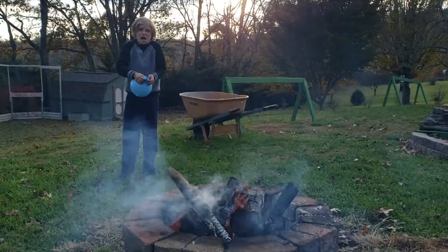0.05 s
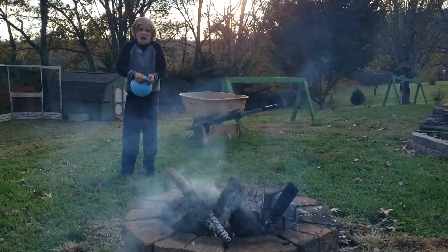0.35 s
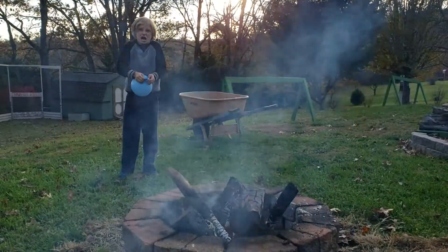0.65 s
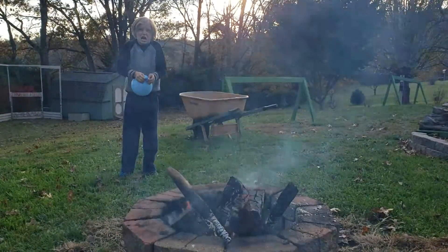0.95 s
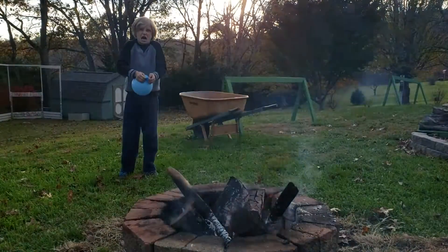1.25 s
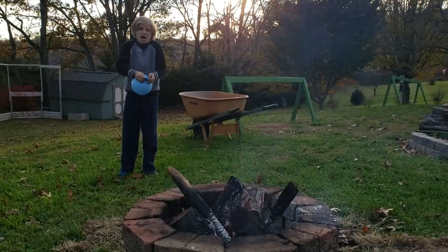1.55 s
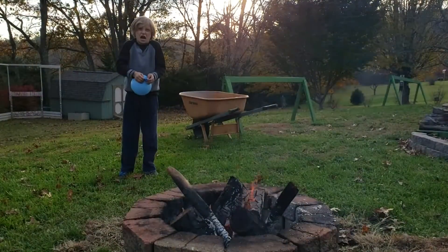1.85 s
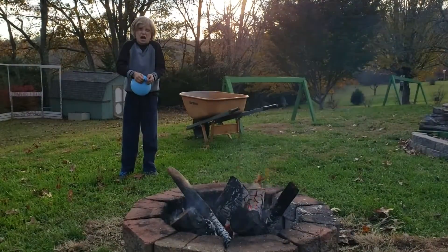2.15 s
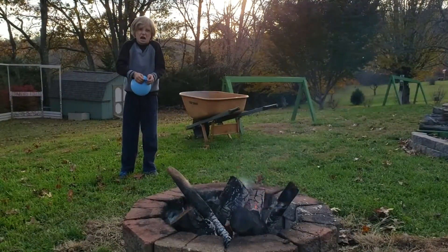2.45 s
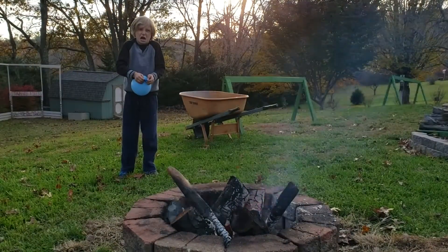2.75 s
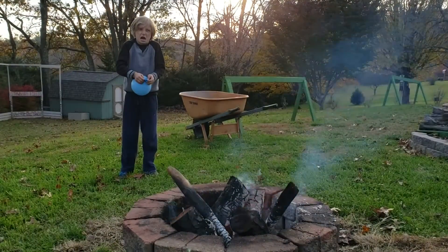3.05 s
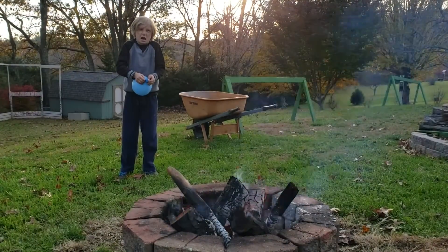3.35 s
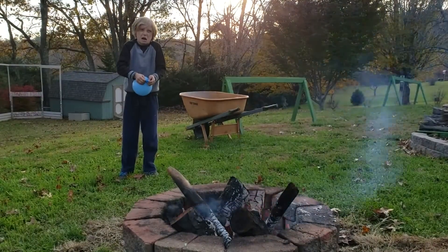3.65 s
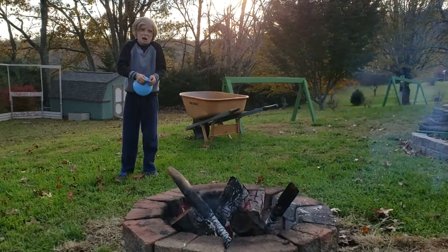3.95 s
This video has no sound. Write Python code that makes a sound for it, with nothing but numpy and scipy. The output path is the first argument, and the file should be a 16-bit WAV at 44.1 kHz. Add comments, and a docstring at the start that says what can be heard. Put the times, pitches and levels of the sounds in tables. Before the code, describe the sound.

Air squeezed through a balloon's neck makes one long, buzzy squeal in an open yard, sagging a little in pitch near the end. Soft wind brushes the microphone, while a close fire gives one sharp pop, then a fainter one.

```python
"""A squealing balloon on a lawn

Air squeals through the stretched neck of a balloon a few metres away. The rubber lips slap shut about
750 times a second, rasping briefly as the grip shifts; the overtones flicker and the yard echoes them.
A light breeze rumbles on the microphone, and close by a wood fire pops twice."""
import sys
import numpy as np
from scipy import signal
from scipy.fft import rfft, irfft, next_fast_len
from scipy.io import wavfile
from scipy.ndimage import uniform_filter1d, map_coordinates

SR = 44100
rng = np.random.default_rng(int(sys.argv[2]) if len(sys.argv) > 2 else 0)


def unload_wav(signal):
    """Save mono or channel-first audio to the path in sys.argv[1] as 16-bit WAV at rate SR, clipped to [-1, 1]."""
    wavfile.write(
        sys.argv[1],
        SR,
        np.round(np.clip(np.atleast_2d(signal).T, -1, 1) * 32767).astype(np.int16),
    )


N = 176400  # 4 seconds

# How fast the rubber lips slap shut: time_s, pitch_hz
SLAP_PITCH = [(0.0, 751.0), (0.1, 747), (0.14, 752.7), (0.19, 748), (0.27, 765.0), (0.53, 758.4),
              (0.58, 766), (0.61, 755.3), (0.73, 756.3), (0.76, 751), (0.81, 757.3), (0.86, 745),
              (0.9, 751.6), (0.96, 743), (1.02, 754), (1.08, 747.2), (1.11, 754.8), (1.19, 750.9),
              (1.23, 753.7), (1.29, 745), (1.33, 752), (1.43, 747.4), (1.49, 745.2), (1.78, 746.3),
              (1.82, 738.5), (1.88, 739), (1.99, 716.7), (2.05, 725.2), (2.1, 718), (2.22, 741.0),
              (2.31, 747.3), (2.58, 750), (2.79, 742.4), (2.85, 743.3), (2.9, 737), (2.95, 742),
              (2.99, 732.7), (3.04, 739.9), (3.1, 730), (3.23, 722.6), (3.37, 722), (3.47, 709.7),
              (3.5, 718), (3.69, 723), (3.86, 718.4), (3.99, 724)]
# Moments when the slaps turn uneven: middle_s, half_width_s, extra_jitter_db
ROUGH_MOMENTS = [(.44, .04, 7), (3.72, 0.083, 14)]
# The squeal's harmonics (tones at 1, 2, 3... times the pitch): level_db, left_over_right_db, left_lead_rad
HARMONICS = [(-49, -.5, 0.18), (-43, -2.5, 0.72), (-41, 2, 0.72), (-48, -5, 1.24), (-47.5, -4.5, 2),
             (-41.5, -1.5, 3), (-40.5, 1.5, 1.8), (-39, 0, 2.5), (-41, -3.5, -2), (-45, 4, -2.5),
             (-44.5, 2.5, -2.8), (-49, 4.5, -1.5), (-48, 3, -1.5), (-46, -5.5, -2.4), (-42.5, 4.5, -2.5),
             (-42.5, -13, -1.1), (-39.5, 0, 0.5), (-37.5, -4, 0.6), (-40.5, 2, 1.5), (-42, -1, -0.6),
             (-44.5, 4, -6)]
# Groups of harmonics grow louder and softer, one list a group, lowest first: time_s, change_db
GROUP_LEVELS = [
    [(0, -1), (.4, -2), (.8, 0.5), (4, 1.5)],
    [(0, 4), (.4, -0.5), (.8, 5.5), (1.33, -3.5), (1.75, 4.5), (2.2, -1.5), (2.5, 0.5), (2.9, -5),
     (3.45, -3), (4, -8.5)],
    [(0, 1), (.38, -3.5), (.65, 3.5), (1, 0), (1.23, -6), (1.45, 2.5), (2.1, 2.5), (2.65, -5), (3.35, 1.5),
     (3.62, -6), (4, -2.5)],
    [(0, 3), (.22, -7), (.72, 2), (1.17, -4.5), (1.7, 5), (2.12, 0.5), (2.35, 2.5), (3.3, -2.5), (3.68, -9),
     (4, -8)],
    [(0, -0.5), (.35, -3.5), (.75, 2), (1.2, -3.5), (1.68, 6), (2.1, -4.5), (2.4, 4), (2.6, -4), (4, -7.5)],
    [(0, -1.5), (.95, 0.5), (1.48, -2), (1.63, 10), (2.15, -2), (2.4, 4), (3, 0.5), (3.25, -7.5), (4, -6.5)],
    [(0, -0.5), (.85, 2), (1.15, -2.5), (1.45, 1.5), (1.58, 3.5), (2.22, -7.5), (2.36, 5.5), (2.55, -1),
     (3.05, -0.5), (4, -5.5)],
    [(0, -2), (.45, 0), (.68, 3.5), (1, 3.5), (1.12, -6), (1.28, 1), (1.48, -4), (1.56, 5), (1.97, 4),
     (2.07, -1.5), (2.24, -3), (2.37, 7), (2.55, 2), (3.03, 3), (3.46, -1.5), (4, -8.5)],
]
# Where each group after the first begins: harmonic_number
GROUP_STARTS = [2, 3, 4, 6, 8, 10, 15]
# The highest harmonics swing from side to side: time_s, left_over_right_db
SIDE_SWING = [(0, 9), (.52, 6.5), (.66, 0.5), (1, -4), (1.15, 4), (1.58, 4), (1.7, -7), (2, -4), (2.2, -1),
              (2.38, -8.5), (2.55, 0)]
# Hot, smoky air drifts past and makes the harmonics fade: time_s, fades_per_s, relative_depth
HOT_AIR = [(0, 12, 0.92), (1.35, 17.45, 1.52), (1.6, 7.02, 0.79), (2.4, 8.01, 0.83), (4, 9.4, 0.99)]
# High tones fade more deeply than low ones: frequency_hz, relative_depth
FADE_DEPTHS = [(750, 0.072), (2200, 0.049), (3500, 0.78), (7000, 0.9), (15000, 1)]
# Tone colour of the escaping air: frequency_hz, relative_db
HISS_COLOUR = [(1000, -54), (3000, -30), (6000, -5), (8500, -11.5), (10300, -3), (11700, -15), (13500, 7.5),
               (16000, 0.5)]
# How loud that hiss is: time_s, level_db
HISS_LEVELS = [(0, -53), (.7, -53), (1.15, -57), (1.65, -66), (2.6, -52), (3.3, -53.5), (4, -48)]
# The breeze rises and falls: time_s, relative_db
BREEZE_LEVELS = [(0, -45.5), (.4, -49), (.8, -54.5), (1.2, -44), (1.75, -63), (2.3, -57.5), (2.7, -49),
                 (3.4, -67), (4, -64)]
# Short puffs of wind hit the microphone: middle_s, half_width_s, relative_db
PUFFS = [(0.63, 0.082, -34.5), (0.768, 0.03, -38.5), (0.982, 0.12, -41.5), (2.862, 0.037, -38.5),
         (2.962, 0.017, -36), (3.046, 0.029, -35.5), (3.212, 0.037, -46)]
# Tone colour of the wind's rumble: frequency_hz, relative_db
RUMBLE_COLOUR = [(20, -26), (40, -0.5), (65, 3.5), (130, -5), (200, -18), (300, -26.5), (500, -50),
                 (1000, -91)]
# Tone colour of the open air's hush and low drone: frequency_hz, relative_db
AIR_COLOUR = [(30, -16), (52, 18.5), (61, 25), (72, 18), (130, 13), (250, 5), (400, -4), (700, -1.5),
              (1100, -7.5), (1800, -18), (3000, -54), (16000, -11)]
# The neck rasps as the grip shifts: middle_s, half_width_s, level_db
RASP_MOMENTS = [(0.25, 0.014, -35), (0.544, .02, -45), (1.973, 0.018, -35), (2.16, .03, -44),
                (2.4, 0.029, -37)]
# Tone colour of a rasp: frequency_hz, relative_db
RASP_COLOUR = [(3000, -57), (9500, -13), (10700, -18), (11300, -3), (13300, 5), (14200, -10), (16000, -16)]
# The fire's pops: start_s, level_db, snap_pitch_hz, log_ring_db
FIRE_POPS = [(1.4144, -20.5, 4800, -0.5), (2.9958, -31, 2120, -6)]
# The notes a log rings with: pitch_hz, relative_db, ring_time_s
LOG_NOTES = [(476, -6.5, 0.0026), (1120, -9.5, 0.0036), (2600, -2, 0.0021)]

# A RATE counts random turns a second. A DECAY or ring time is how long a sound takes to fall 60 dB.
REST_HZ = 748  # the pitch at which the levels in HARMONICS apply
WAVER_HZ, WAVER_RATE = 1, 67  # tiny wavering of the pitch
JITTER_RAD, JITTER_RATE = 0.0092, 286.4  # slaps come slightly early or late
TREMBLE, TREMBLE_RATE = 0.034, 180  # slaps vary in strength
SHIMMER, SHIMMER_RATE = 0.065, 90  # each harmonic shimmers on its own
SPUTTER_DB, SPUTTER_RATE = 1.09, 36  # the upper harmonics sputter together
NEAR_ECHO_S = 0.006954  # average lag of nearby echoes, which cancel some pitches as a tone glides
SPREAD_RAD = 0.089  # the neck delays each harmonic a little more, which softens the slap
HISS_PATCHY_DB, HISS_PATCH_RATE = 6, 14  # the hiss comes and goes
RUMBLE_GAIN_DB, RUMBLE_LEFT_DB, AIR_DB = 2, 4.5, -50
YARD_DB, YARD_DECAY_S, YARD_LOW_HZ = -11.5, 0.44, 6700  # the lawn soaks up echo below YARD_LOW_HZ
SNAP_DECAY_S, CRACK_DB, CRACK_DECAY_S = 0.0044, 8, 0.0013
CRACK_REACH = 1.1  # a pop's treble rolls off above this many times its snap pitch
FIRE_ECHO_DB = -14  # the fire is close, so it has much less echo than the balloon
TOP_HZ = 16000


def amp(db):
    """Turn decibels into a number to multiply by."""
    return 10 ** (np.asarray(db) / 20)


def unit(x):
    """Scale a sound to an average (rms) strength of 1."""
    return x / np.sqrt(np.mean(x ** 2) + 1e-20)


def along(points, hz):
    """Look up a frequency in a table, sliding between its rows on a musical (log) scale."""
    frequencies, values = np.transpose(points)
    return np.interp(np.log(hz + 1), np.log(frequencies + 1), values)


def curves(rows):
    """Join a table's points in time: one curve for each column after the first."""
    times, *columns = np.transpose(rows)
    return [np.interp(np.arange(N) / SR, times, column) for column in columns]


def swell(middle_s, half_width_s):
    """A bell-shaped rise and fall around a moment."""
    return np.exp(-((np.arange(N) / SR - middle_s) / half_width_s) ** 2)


def drift(position):
    """A smooth random curve that reaches a new value each time position grows by 1."""
    return map_coordinates(rng.standard_normal(8192), [position], mode='wrap')


def wobble(rate):
    """A smooth random curve with `rate` new values a second."""
    return drift(np.arange(N) * rate / SR)


def fading(position):
    """A drifting complex number that changes both the strength and the timing of a tone."""
    coarse = np.arange(0, N, 64)
    gain = drift(position[coarse]) + 1j * drift(position[coarse])
    return np.interp(np.arange(N), coarse, gain) / np.sqrt(2)


def filtered(x, response):
    """Turn each frequency up or down by response(hz)."""
    size = next_fast_len(N + SR // 2)
    return irfft(rfft(x, size) * response(np.fft.rfftfreq(size, 1 / SR)), size)[..., :N]


def noise(colour, shared, gate=1):
    """Stereo noise, pulsed by `gate` and then coloured; `shared` is the part both sides have in common."""
    white = np.sqrt(shared) * rng.standard_normal(N) + np.sqrt(1 - shared) * rng.standard_normal((2, N))
    return unit(filtered(gate * white, lambda hz: amp(along(colour, hz))))


def pan(left_db):
    """Make the left side louder than the right by left_db, keeping the total power."""
    gains = amp(np.array([[1], [-1]]) * left_db / 2)
    return gains / np.sqrt(np.mean(gains ** 2, axis=0))


def neck_flutter():
    """The lips open and shut, a little unevenly. Gives their pitch and phase (one turn per slap)."""
    pitch = uniform_filter1d(curves(SLAP_PITCH)[0], size=700)
    jitter = JITTER_RAD * amp(sum(db * swell(s, width) for s, width, db in ROUGH_MOMENTS))
    phase = 2 * np.pi * np.cumsum(pitch + WAVER_HZ * wobble(WAVER_RATE)) / SR
    return pitch, phase + jitter * wobble(JITTER_RATE)


def squeal(pitch, phase):
    """The slaps make a stack of harmonics, which sputter, and fade in the hot air and as they glide."""
    t = np.arange(N) / SR
    fade_rate, fade_depth = curves(HOT_AIR)
    air_fades = np.cumsum(fade_rate) / SR
    glide_fades = NEAR_ECHO_S * np.cumsum(abs(np.gradient(pitch)))
    groups_db = [curves(rows)[0] for rows in GROUP_LEVELS]
    sputter_db = SPUTTER_DB * fade_depth * wobble(SPUTTER_RATE)
    tremble = 1 + TREMBLE * wobble(TREMBLE_RATE)
    swing_db = curves(SIDE_SWING)[0]
    numbers, resting_db = np.arange(len(HARMONICS)) + 1, np.transpose(HARMONICS)[0]
    out = np.zeros((2, N))
    for k, (_, left_db, lead_rad) in enumerate(HARMONICS, 1):
        # The tone arrives directly and by scattered paths, which add up or cancel.
        direct = np.exp(.5j * lead_rad * np.array([[1], [-1]])) * (1 + SHIMMER * fading(SHIMMER_RATE * t))
        depth = fade_depth * along(FADE_DEPTHS, k * pitch.mean())
        fades = air_fades + k * glide_fades
        paths = direct + depth * np.array([fading(fades), fading(fades)])
        slow_power = uniform_filter1d(np.mean(abs(paths) ** 2, axis=0), size=SR // 9)
        paths = paths / np.sqrt(slow_power)  # even out slow changes, keep the quick flicker
        wave = np.real(paths * np.exp(1j * k * (phase - SPREAD_RAD * k)))
        # The frequencies that ring loudest stay put while the pitch moves.
        resonance_db = np.interp(k * pitch / REST_HZ, numbers, resting_db)
        group_db = groups_db[np.searchsorted(GROUP_STARTS, k, 'right')]
        height = k / len(HARMONICS)
        level = amp(resonance_db + group_db + np.sqrt(height) * sputter_db) * tremble
        out += np.sqrt(2) * level * pan(left_db + height * swing_db) * wave
    return out


def hiss(opening):
    """Air hisses out each time the lips open."""
    level_db = curves(HISS_LEVELS)[0] + HISS_PATCHY_DB * wobble(HISS_PATCH_RATE)
    return amp(level_db) * noise(HISS_COLOUR, shared=0.67, gate=opening)


def breeze():
    """Wind pushes on the microphone with a lumpy rumble and a few short puffs."""
    lumps = unit(amp(0.82 * wobble(rate=21.9)) * noise(RUMBLE_COLOUR, shared=0.29))
    puffs = sum(amp(db) * swell(s, width) for s, width, db in PUFFS)
    strength = amp(curves(BREEZE_LEVELS)[0]) + puffs
    return amp(RUMBLE_GAIN_DB) * strength * pan(RUMBLE_LEFT_DB) * lumps


def open_air():
    """The steady hush and low drone of the outdoors."""
    return amp(AIR_DB) * noise(AIR_COLOUR, shared=0.62)


def yard_echo(x):
    """Sheds and trees scatter a thin, bright echo."""
    t = np.arange(SR // 2) / SR
    build_up = 1 - np.exp(-t / 0.017)
    tail = rng.standard_normal((2, len(t))) * amp(-60 * t / YARD_DECAY_S) * build_up
    echo = signal.fftconvolve(x, tail / np.linalg.norm(tail[0]), axes=1)[:, :N]
    return amp(YARD_DB) * filtered(echo, lambda hz: hz / np.hypot(hz, YARD_LOW_HZ))


def rasp(opening):
    """As the grip shifts, the neck gives short bursts of bright noise that pulse with the lips."""
    bursts = sum(amp(db) * swell(s, width) for s, width, db in RASP_MOMENTS)
    return bursts * noise(RASP_COLOUR, shared=0.45, gate=opening)


def fire():
    """Each pop is a tiny crack with a pitched snap; it rings the log for a few milliseconds."""
    out, t = np.zeros((2, N)), np.arange(SR // 10) / SR
    for start_s, pop_db, snap_hz, log_db in FIRE_POPS:
        notes = [(hz, db + log_db, ring_s) for hz, db, ring_s in LOG_NOTES] + [(snap_hz, 0, SNAP_DECAY_S)]
        ring = sum(amp(db - 60 * t / ring_s) * np.sin(2 * np.pi * hz * t) for hz, db, ring_s in notes)
        crack = amp(CRACK_DB - 60 * t / CRACK_DECAY_S) * rng.standard_normal((2, len(t)))
        pop = np.pad(amp(pop_db) * (ring + crack), ((0, 0), (round(start_s * SR), 0)))
        out += filtered(pop, lambda hz: 1 / np.hypot(1, (hz / (CRACK_REACH * snap_hz)) ** 3))
    return out


def scene():
    """Mix the balloon, the fire and their echo with the breeze and the open air."""
    pitch, phase = neck_flutter()
    opening = np.exp(1.4 * np.cos(phase))  # the gap between the lips, widest once a cycle
    balloon = squeal(pitch, phase) + hiss(opening) + rasp(opening)
    pops = fire()
    echo = yard_echo(balloon + amp(FIRE_ECHO_DB) * pops)
    return balloon + pops + echo + breeze() + open_air()


def record(dry):
    """Cut away the very highest treble, above TOP_HZ."""
    return filtered(dry, lambda hz: hz < TOP_HZ)


dry = scene()
out = record(dry)
unload_wav(out)
```